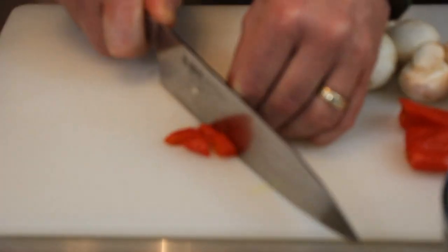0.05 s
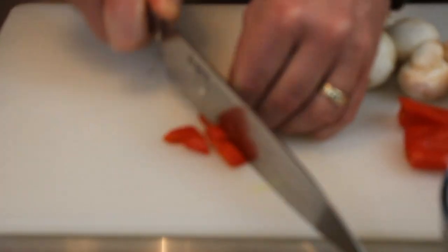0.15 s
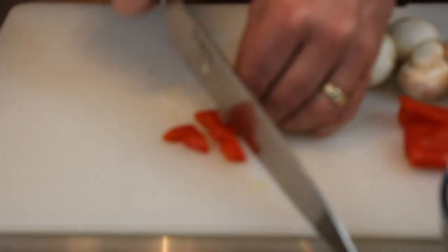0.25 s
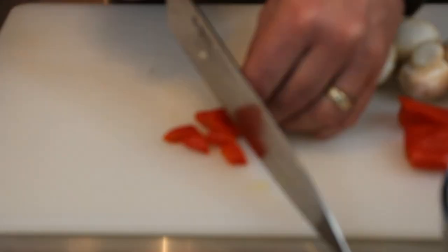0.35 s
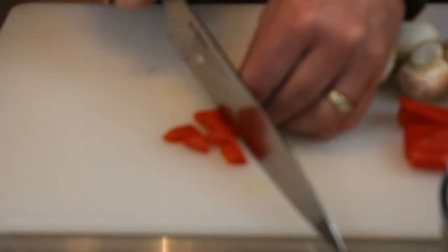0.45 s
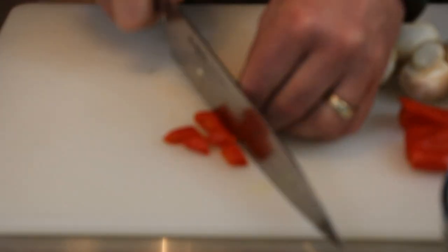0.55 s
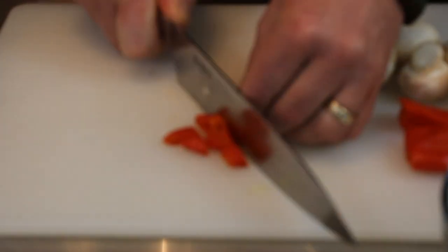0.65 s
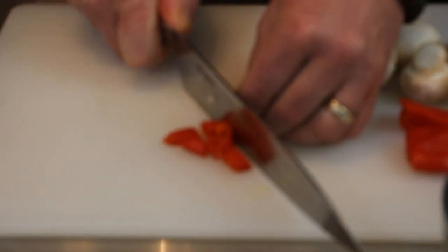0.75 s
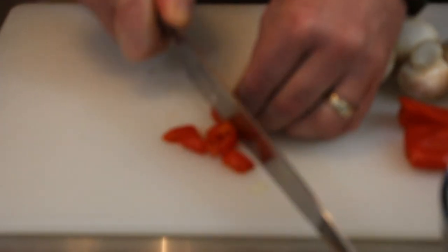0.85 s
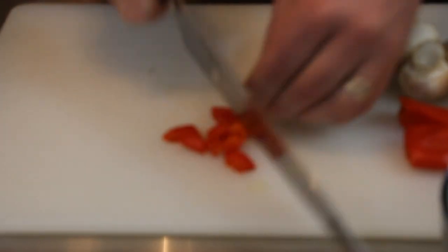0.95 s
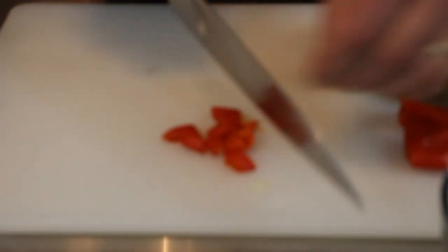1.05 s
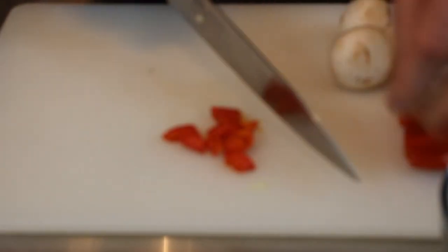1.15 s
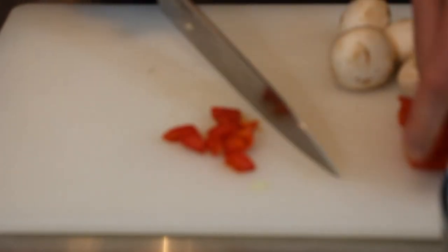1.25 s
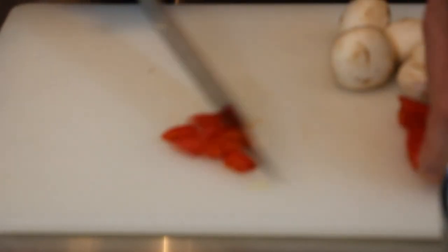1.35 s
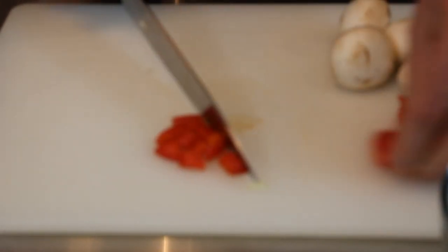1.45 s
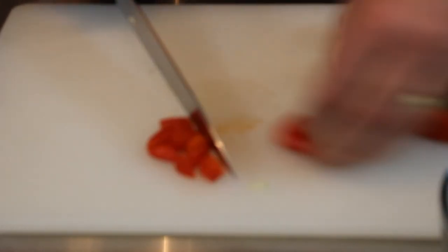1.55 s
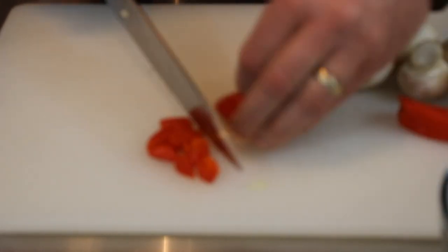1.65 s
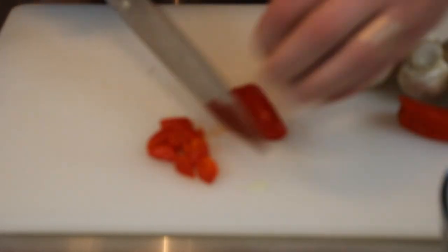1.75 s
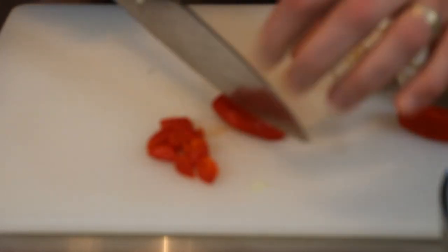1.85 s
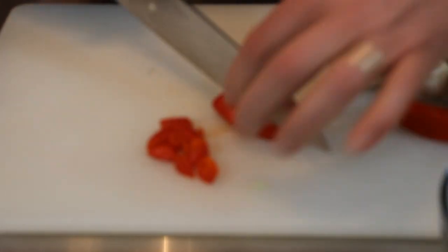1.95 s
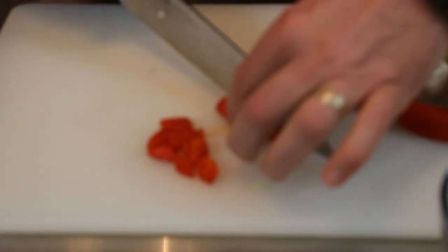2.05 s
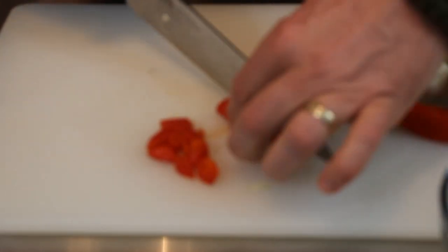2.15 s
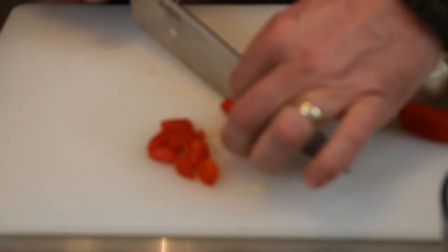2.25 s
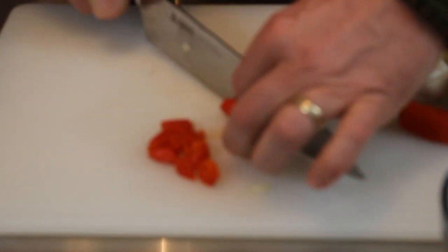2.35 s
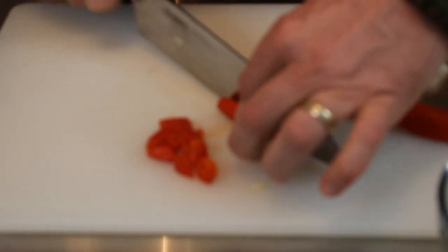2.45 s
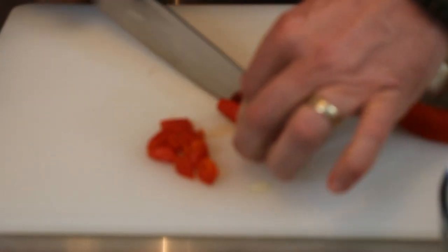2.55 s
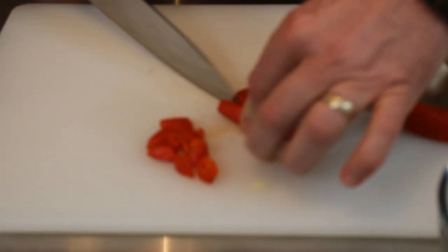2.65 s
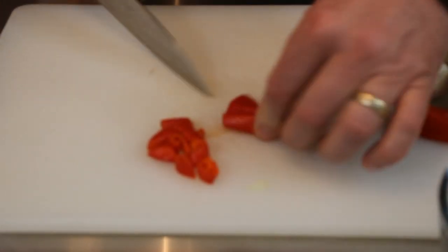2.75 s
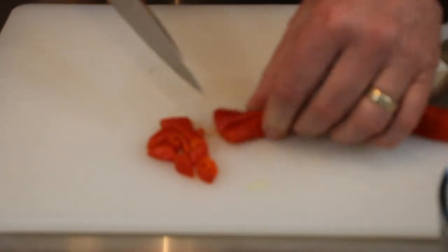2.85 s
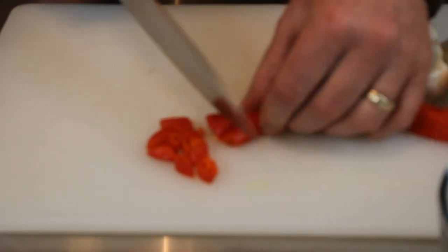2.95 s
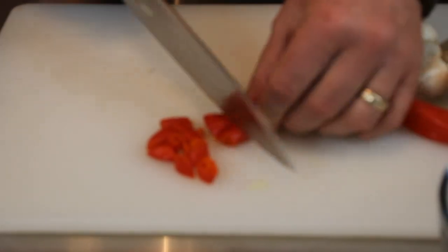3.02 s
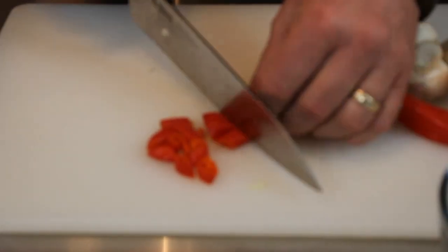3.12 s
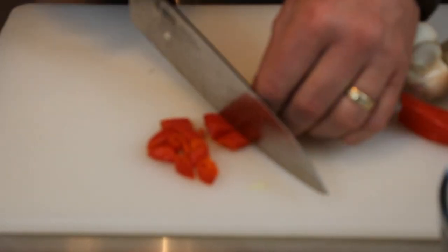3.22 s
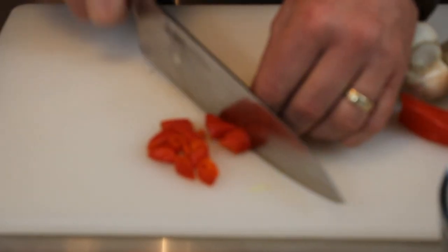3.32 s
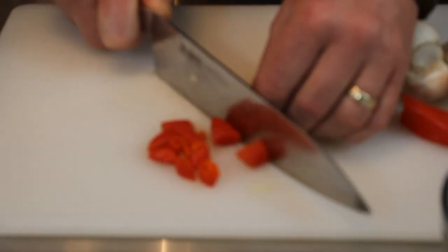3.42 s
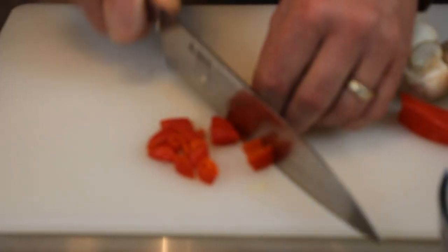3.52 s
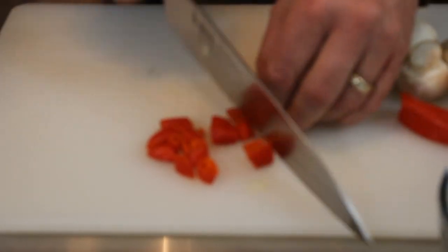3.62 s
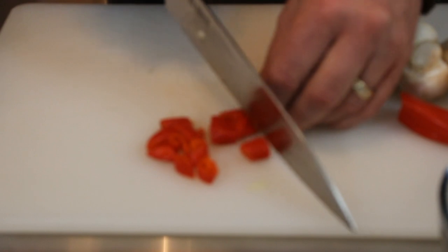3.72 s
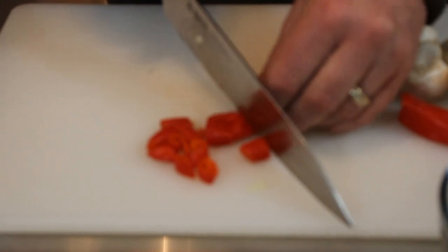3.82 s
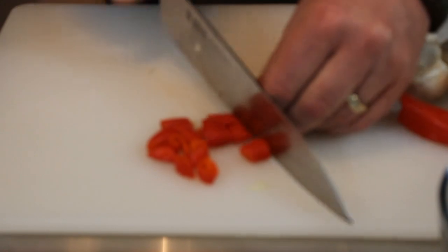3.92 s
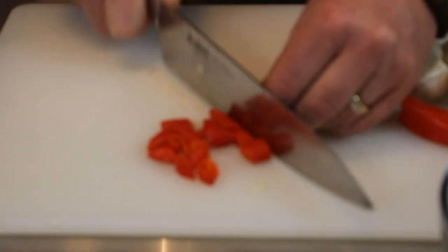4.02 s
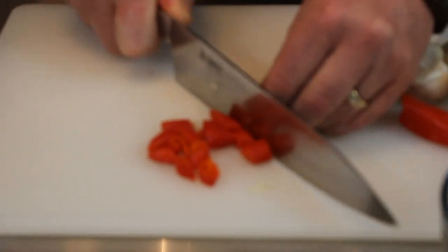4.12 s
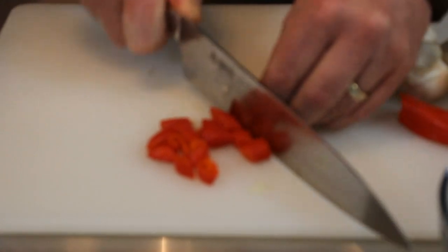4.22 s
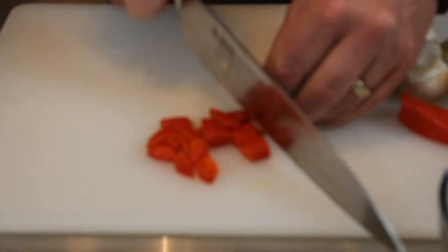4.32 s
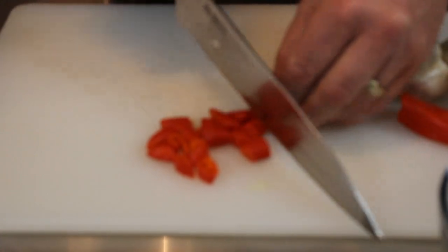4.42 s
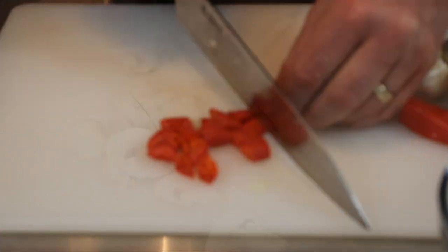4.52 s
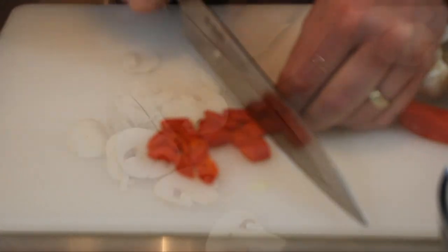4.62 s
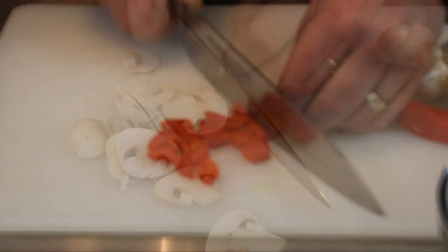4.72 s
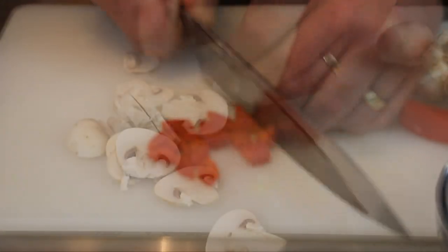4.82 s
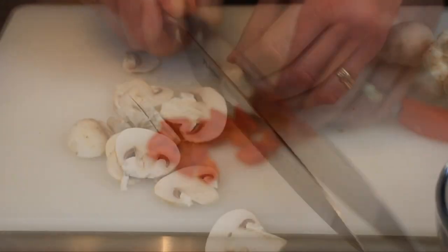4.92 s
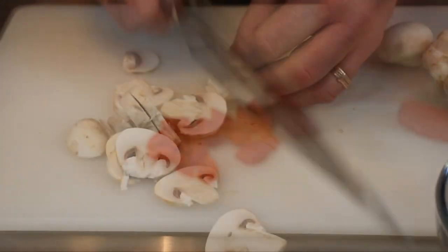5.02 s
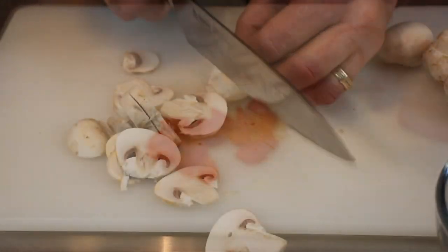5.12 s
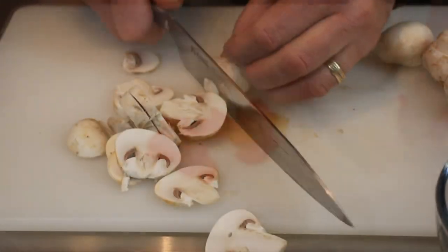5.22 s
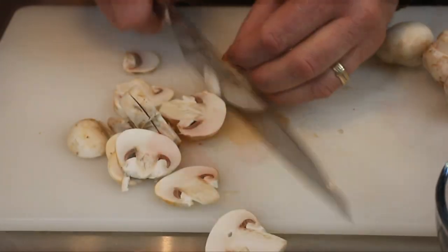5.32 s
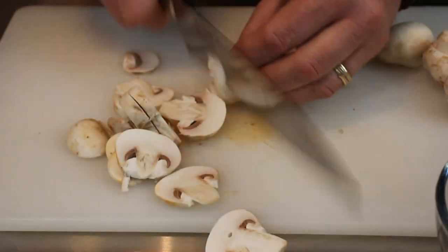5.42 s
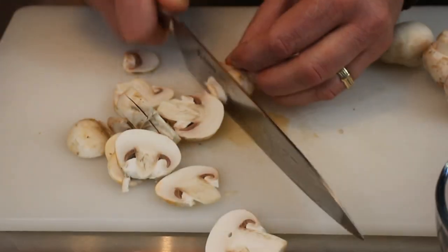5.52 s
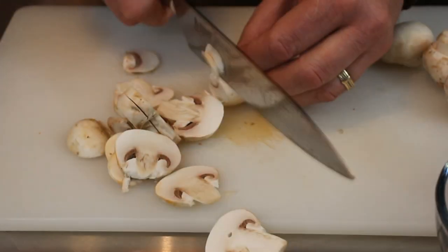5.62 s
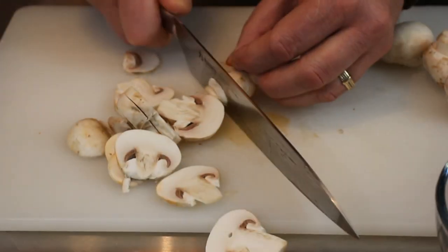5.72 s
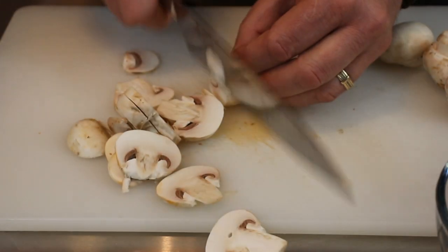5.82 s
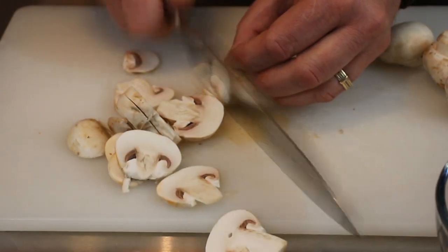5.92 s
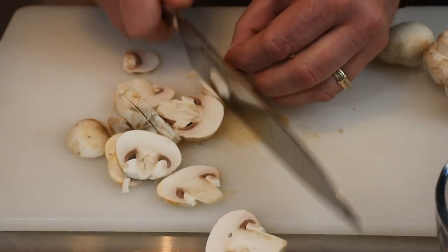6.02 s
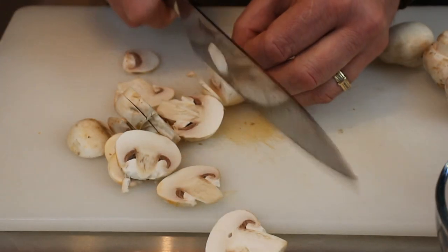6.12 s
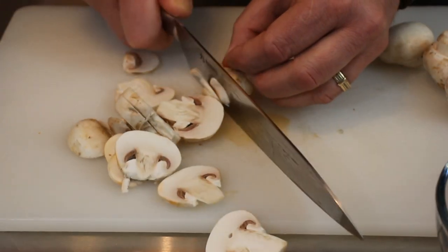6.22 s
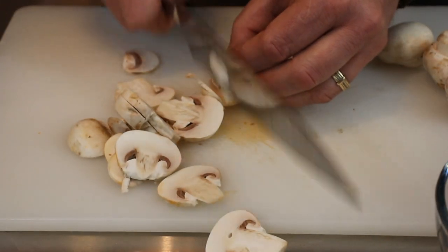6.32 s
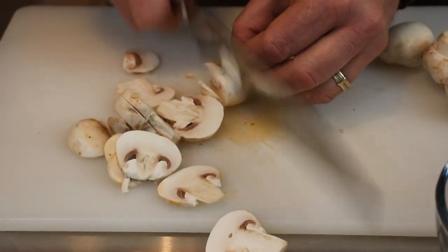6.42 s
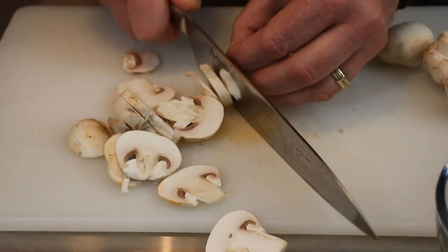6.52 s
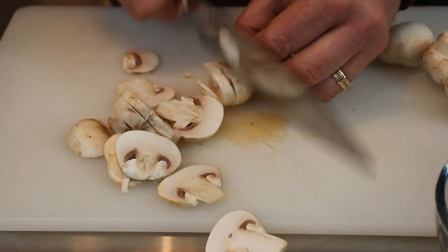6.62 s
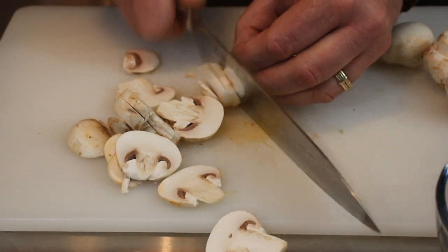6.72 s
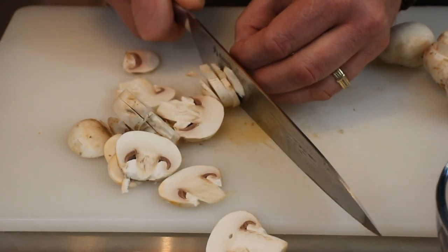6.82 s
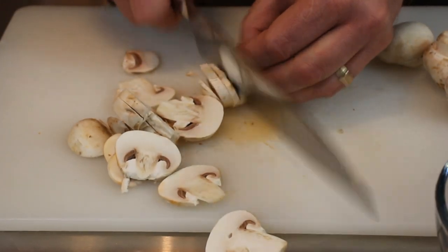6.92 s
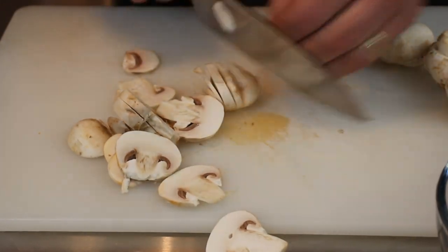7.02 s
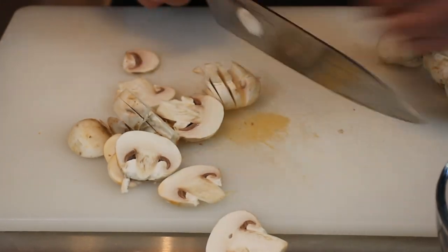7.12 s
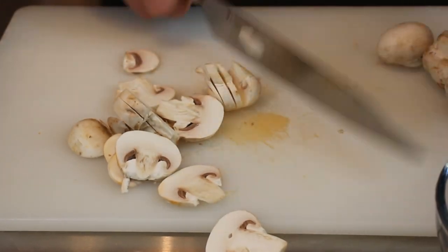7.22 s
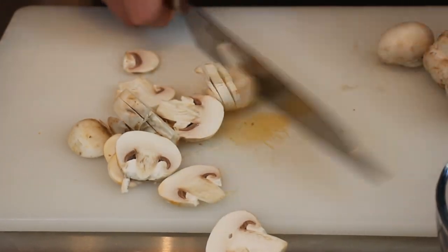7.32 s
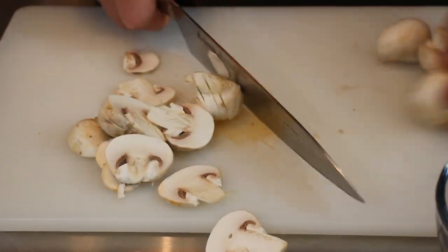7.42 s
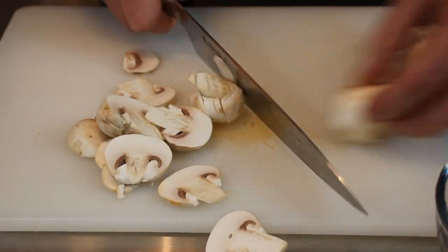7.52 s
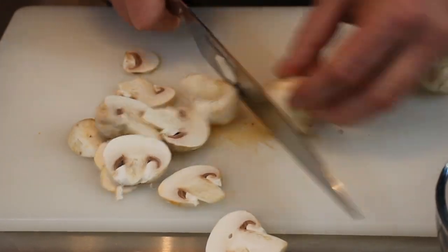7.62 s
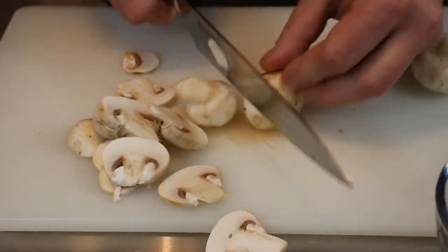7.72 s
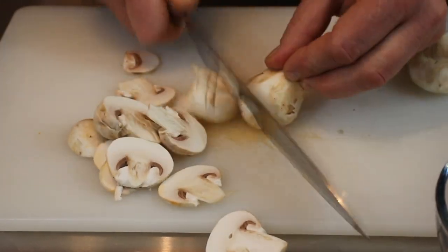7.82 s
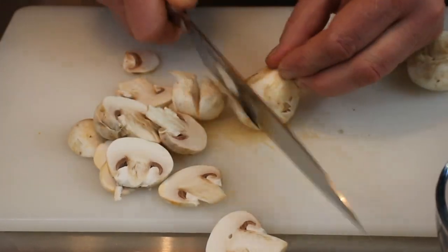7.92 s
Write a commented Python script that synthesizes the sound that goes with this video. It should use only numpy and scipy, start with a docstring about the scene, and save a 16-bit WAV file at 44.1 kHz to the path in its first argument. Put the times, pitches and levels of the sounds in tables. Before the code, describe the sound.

A chef's knife crunches through pepper, then mushrooms, knocking hard on a plastic board, first in scattered blows, then a brisk even run, in a live kitchen.

```python
"""A chef's knife close to the microphone cuts a pepper, then mushrooms, on a plastic board in a live kitchen.
Each blow rings damped modes of the board's face and body, with a click, a diffuse echo and standing waves.
Noisy grains make the crunch, two sideways scrapes of the edge, some soft slides and one short tick. Behind it
lie room air and an appliance's drone. A limiter ducks the loud knocks and recovers steadily."""
import sys
import numpy as np
from scipy import signal
from scipy.fft import rfft, irfft, next_fast_len
from scipy.io import wavfile
from scipy.ndimage import uniform_filter1d

SR = 44100
rng = np.random.default_rng(int(sys.argv[2]) if len(sys.argv) > 2 else 0)


def output_pcm(signal):
    """Save a mono or channel-first signal as 16-bit PCM at the path in sys.argv[1].

    Samples are clipped to [-1, 1] before scaling.
    """
    pcm = np.clip(np.atleast_2d(signal).T, -1, 1) * 32767
    wavfile.write(sys.argv[1], SR, np.round(pcm).astype(np.int16))


N = 351036
TIME = np.arange(N) / SR
SPLICE_S = 4.963  # the pepper scene ends and the mushroom scene begins


def amp(db):
    """Turn decibels into an amplitude factor."""
    return 10 ** (np.asarray(db) / 20)


def unit(x):
    """Scale a sound to rms 1."""
    return x / np.sqrt(np.mean(x ** 2) + 1e-20)


def along(points, hz):
    """Interpolate (Hz, value) points on a logarithmic frequency axis."""
    point_hz, value = np.transpose(points)
    return np.interp(np.log(hz + 1), np.log(point_hz), value)


def filtered(x, response):
    """Multiply the spectrum of x by a function of frequency, without phase shift."""
    size = x.shape[-1]
    padded = next_fast_len(size + 8192)
    hz = np.fft.rfftfreq(padded, 1 / SR)
    return irfft(rfft(x, padded) * response(hz), padded)[..., :size]


def coloured(x, points):
    """Shape x by a (Hz, dB) curve and bring it to rms 1."""
    return unit(filtered(x, lambda hz: amp(along(points, hz))))


def add(track, start_s, sound):
    """Mix a sound in at its start; what starts before the splice stops there."""
    start = round(start_s * SR)
    limit = round(SPLICE_S * SR) if start_s < SPLICE_S else N
    first = max(start, 0)
    stop = min(start + sound.shape[-1], limit)
    if stop > first:
        track[..., first:stop] += sound[..., first - start:stop - start]


def ring(modes, wander=0):
    """Sum damped sines over a second; each strike varies their strength and, by wander, their pitch."""
    hz, db, t60 = np.transpose(modes)[:, :, None]
    t = TIME[:min(SR, round(2 * t60.max() * SR))]
    hz = hz * (1 + wander * rng.uniform(-1.22, 1, hz.shape))
    level = amp(db + 1.6 * rng.standard_normal(db.shape))
    decay = np.exp(-np.log(1000) * t / t60)
    sound = np.sum(level * decay * np.sin(2 * np.pi * hz * t), axis=0)
    return np.pad(sound, (0, SR - len(t)))


def grains(rate):
    """Scatter tiny impulses of uneven size, on average rate a second."""
    return (rng.random(N) < rate / SR) * rng.laplace(size=N)


def strokes(rows):
    """Add a bell of loudness for each stroke (middle s, spread s, dB)."""
    total = np.zeros(N)
    for middle_s, spread_s, db in rows:
        total += amp(db) * np.exp(-((TIME - middle_s) / spread_s) ** 2 / 2)
    return total


# Stereo width of sound from all around the microphone. Each row: frequency in Hz, side over mid in dB.
STEREO_WIDTH = [(100, -17), (400, -15.5), (1200, -8), (3000, -4.5), (8000, -1)]


def diffuse(size):
    """Make stereo noise from all around: alike in the bass, nearly unrelated in the treble."""
    mid, side = rng.standard_normal((2, size))
    side = filtered(side, lambda hz: amp(along(STEREO_WIDTH, hz)))
    return np.array([mid + side, mid - side])


# How long the kitchen rings. Each row: frequency in Hz, time to fall by 60 dB in seconds.
KITCHEN_DECAY = [(100, 0.75), (250, 0.48), (1000, 0.5), (3000, 0.41), (8000, 0.39), (15000, 0.3)]


def echo(colour):
    """The kitchen's answer, of energy 1: it builds within milliseconds and its treble dies first."""
    hz, t, spectrum = signal.stft(coloured(diffuse(size=SR), colour), SR, nperseg=256)
    decay = np.exp(-np.log(1000) * t / along(KITCHEN_DECAY, hz)[:, None])
    tail = signal.istft(spectrum * decay, SR, nperseg=256)[1][:, :SR]
    tail = tail * (1 - np.exp(-(TIME[:SR] / .003) ** 2))
    return unit(tail) / np.sqrt(SR)


# Colour of the kitchen's air noise. Each row: frequency in Hz, relative level in dB per Hz.
AIR_COLOUR = [(25, -22), (45, -0.5), (65, 2.5), (85, -10.5), (125, -1.5), (170, -2), (250, -2.5), (310, -8),
              (380, -3.5), (550, -8.5), (1200, -13), (2200, -19.5), (6000, -27), (16000, -38)]
# Lines of an appliance's drone. Each row: frequency in Hz, level in dB.
APPLIANCE_LINES = [(166.9, -55), (242.2, -52.5), (360.7, -52), (597.5, -59.5), (839.8, -58.5), (1211, -63)]


def room_tone(air_db=-44, hum_db=0, waver_hz=7):
    """Steady air noise, and an appliance's drone whose lines are narrow bands of noise."""
    def lines(hz):
        return sum(amp(db) / (1 + ((hz - centre) / waver_hz) ** 2) for centre, db in APPLIANCE_LINES)

    drone = unit(filtered(rng.standard_normal(N), lines))
    drone = drone * np.linalg.norm([amp(db) for _, db in APPLIANCE_LINES])
    air = coloured(diffuse(size=N), AIR_COLOUR)
    return amp(air_db) * air + amp(hum_db) * drone


# The edge set down on the board, then scraped sideways. Each row: contact in seconds, force in dB,
# wait for the fastest moment in seconds, spread of the stroke in seconds, scrape level in dB.
SWEEPS = [(1.2645, 0, 0.12, 0.036, -29.5), (7.3058, 5, 0.079, 0.028, -29.5)]
# Colour of the edge on plastic. Each row: frequency in Hz, relative level in dB per Hz.
EDGE_COLOUR = [(100, -4.5), (250, 3.5), (600, 5.5), (1300, -3.5), (2500, -5.5), (4500, -11.5), (7000, -15),
               (11000, -22.5), (15500, -20)]
# Resonances of the blade. Each row: frequency in Hz, width in Hz, level of the added resonance in dB.
BLADE_MODES = [(1220, 62, 11), (1904, 100, 5.5), (5940, 97, 4.5), (6170, 84, -2), (7870, 120, 6),
               (8900, 120, 12), (10000, 220, 13.5), (11320, 140, 13), (11800, 150, 6)]
# Soft slides of the knife and of cut pieces over the board, and one short tick.
# Each row: middle in seconds, spread in seconds, level in dB.
SLIDES = [(1.6, .075, -49.5), (2.585, 0.033, -44), (2.70, 0.097, -48.5), (4.715, 0.0083, -46),
          (7.6, 0.024, -57)]
# Colour of the slides and the tick. Each row: frequency in Hz, relative level in dB.
SLIDE_COLOUR = [(60, -22), (200, 10), (600, 2.5), (1400, 0), (2500, 0), (3400, 0), (4600, -5.5),
                (7000, -11), (11500, -10), (16000, -25)]


def scraping():
    """The edge sticks and slips on the plastic and rings the blade; soft slides and a tick join it."""
    def steel(hz):
        return 1 + sum(amp(db) / (1 + (2 * (hz - centre) / width) ** 2)
                       for centre, width, db in BLADE_MODES)

    rasp = unit(filtered(coloured(grains(rate=12000), EDGE_COLOUR), steel))
    scrapes = [(s + wait_s, spread_s, db) for s, _, wait_s, spread_s, db in SWEEPS]
    sliding = coloured(grains(rate=14000), SLIDE_COLOUR)
    return strokes(scrapes) * rasp + strokes(SLIDES) * sliding


# The plastic board under the blade. Each row: frequency in Hz, level in dB, 60 dB decay in seconds.
BOARD_MODES = [(273, -15.5, .05), (690, -4.5, .034), (831, -20, .029), (984, -15, .044), (1342, -11, .016),
               (1520, -17, .03), (1950, -23, .03), (2719, -12.5, .022), (3050, -20, .02), (4850, -23, .014)]
# The board's body, thudding low. Each row: frequency in Hz, level in dB, 60 dB decay in seconds.
BODY_MODES = [(160, -30, 0.034), (231, -36.5, 0.099), (389, -26.5, 0.082), (548, -27.5, 0.11)]


def board_knock(flatness=0, wander=0, thud_db=13, bass_hz=170):
    """Board modes, plus the body's low thud from a flat landing; a small board pushes little air in the bass."""
    knock = ring(BOARD_MODES, wander)
    knock = knock + flatness * amp(thud_db) * ring(BODY_MODES, wander)
    return signal.lfilter(*signal.butter(2, bass_hz, "high", fs=SR), knock)


# The knife cuts through and meets the board. Each row: contact in seconds, force in dB,
# flatness of the landing from 0 to 1, time in the flesh in seconds, crunch level at the board in dB.
CHOPS = [(.008, -8, 0.4, 0.026, -35), (0.6896, 10.5, 0.6, 0.1, -38), (2.3089, -6.5, .3, 0.063, -36),
         (3.342, 2, 1, 0.043, -40.5), (4.0944, 11.5, 0.16, 0.022, -34.5), (4.801, 10.5, 0.7, .097, -42.5),
         (5.2518, 10, 0.33, 0.037, -49), (5.5157, 13, 0, 0.048, -47.5), (5.7532, 12.5, 0.1, .02, -58),
         (5.9925, 12, 0.23, .035, -42.5), (6.2362, 13.5, 0.2, .02, -62), (6.5110, 10, 0.32, 0.029, -37),
         (6.785, 12.5, 0.16, 0.036, -37.5), (7.8893, 9, 0.2, 0.025, -42.5)]
# Crisp bits of skin or stem giving way. Each row: start in seconds, level in dB.
SNAPS = [(.5995, -24.5), (.6580, -14), (.6747, -12.5), (.6868, -10), (2.2996, -13.5), (3.3105, -26),
         (3.3358, -15), (4.797, -9.5), (6.491, -20)]
# Colour of bursting cells. Each row: frequency in Hz, relative level in dB per Hz.
FLESH_COLOUR = [(40, -28), (90, -15), (200, 13), (600, 8), (1500, 0), (3000, 2), (5000, -5), (8000, -8.5),
                (12000, -16), (16000, -20)]


def crunch(snap_db=-5, knock_db=-3, sink_db=3, skin_db=-21, skin_s=0.008):
    """Bursting cells grow louder as the blade sinks to the board; snaps also jolt the board."""
    pressure, snaps = np.zeros(N), np.zeros(N)
    for s, _, _, cut_s, db in CHOPS:
        to_go = TIME[:max(round(cut_s * SR), 2)][::-1]
        flesh = amp(db - sink_db * to_go / cut_s)
        # tough pepper skin tears last, just above the board; mushrooms have none
        skin = amp(skin_db) * (to_go < skin_s) if s < SPLICE_S else 0
        add(pressure, s - cut_s, flesh + skin)
    for s, db in SNAPS:
        tear = coloured(rng.standard_normal(SR), FLESH_COLOUR) * np.exp(-TIME[:SR] / 0.0011)
        add(snaps, s, amp(db) * (amp(snap_db) * tear - amp(knock_db) * board_knock()))
    pressure = uniform_filter1d(pressure, size=64)  # the flesh gives way over a millisecond or two
    return snaps + pressure * coloured(grains(rate=9000), FLESH_COLOUR)


# Standing waves of the kitchen. Each row: frequency in Hz, level in dB, 60 dB decay in seconds.
STANDING_MODES = [(212.2, -21.5, 0.63), (243.8, -34.5, 0.86), (260, -28.5, 0.64), (360.4, -23, 0.28),
                  (419, -27.5, 0.58), (688, -35.5, 0.7), (856, -25.5, 0.21), (970, -35, 0.58),
                  (1372, -33.5, 0.51), (1820, -38, 0.53), (2000, -30.5, 0.36)]
# Their change at the microphone's other place for the mushrooms. Each row: frequency in Hz, change in dB.
MOVED_MICROPHONE = [(212, -3.5), (250, 5.5), (355, -1)]


def standing_waves(s):
    """Ring the kitchen's modes as strongly as they reach the microphone's place at time s."""
    modes = [(hz, db + (s > SPLICE_S) * along(MOVED_MICROPHONE, hz), t60)
             for hz, db, t60 in STANDING_MODES]
    return ring(modes)


def blows(contact_hz=2280, set_down_hz=860, set_down_flatness=0.14, hardening=0.32, dulling_db=-4):
    """List contacts as (s, force dB, flatness, corner Hz): harder is brighter, flatter is duller."""
    # the corners are those of a 0 dB edge-on blow; setting down is the duller contact
    contacts = [(s, db, flatness, contact_hz) for s, db, flatness, *_ in CHOPS]
    contacts += [(s, db, set_down_flatness, set_down_hz) for s, db, *_ in SWEEPS]
    return [(s, db, flatness, hz * amp(hardening * db + dulling_db * flatness))
            for s, db, flatness, hz in contacts]


# What the board throws into the room. Each row: frequency in Hz, relative level in dB per Hz.
ROOM_COLOUR = [(30, -10.5), (90, -12.5), (160, -11.5), (250, -1), (450, 1), (700, 1), (1100, -4),
               (1600, -4.5), (2600, -9.5), (4000, -15), (7000, -15), (11000, -9.5), (16000, -10)]


def chops(room_db=14.0, standing_db=-2, change=0.69, click_db=-22, near_walls=1.0, near_s=0.012):
    """The edge strikes the board through a lowpass contact; the echo shifts as the knife moves."""
    out, usual, t = np.zeros((2, N)), echo(ROOM_COLOUR), TIME[:SR]
    for s, db, flatness, corner_hz in blows():
        click = amp(click_db) * np.exp(-t / 0.00097) * diffuse(size=SR)
        direct = board_knock(flatness, wander=.05) + click
        room = amp(room_db) * (usual + change * echo(ROOM_COLOUR)) / np.hypot(1, change)
        room = room * (1 + near_walls * np.exp(-t / near_s))  # worktop and cupboards answer first
        standing = amp(standing_db) * standing_waves(s) * (1 - np.exp(-t / 0.02))
        contact = signal.butter(2, min(corner_hz, SR / 3), fs=SR)
        add(out, s, amp(db) * signal.lfilter(*contact, direct + room + standing))
    return out


def scene(wet_db=-1):
    """The board lies a little to the right; crunch and scraping share one echo of the kitchen."""
    small = crunch() + scraping()
    small_echo = echo([(100, 6.5), (1000, -1.0), (4000, 2.5), (14000, -4)])  # (Hz, dB)
    walls = signal.fftconvolve(small[None], small_echo, axes=1)[:, :N]
    pan = amp([[-.7], [.7]])  # left and right in dB
    return (chops() + small + amp(wet_db) * walls + room_tone()) * pan


# Gentle bass cut after the limiter and clipping. Each row: frequency in Hz, gain in dB.
BASS_CUT = [(75, -8), (130, 0)]


def record(dry, release_db_per_s=105, threshold_db=.3, attack_s=.00095, top_hz=15900):
    """The limiter grabs too late for a loud knock's first swing, which clips, then lets go steadily."""
    level_db = 20 * np.log10(np.abs(dry).max(axis=0) + 1e-9)
    over_db = np.maximum(level_db - threshold_db, 0)
    recovery_db = release_db_per_s * TIME
    held_db = np.maximum.accumulate(over_db + recovery_db) - recovery_db
    lag = np.exp(-1 / (attack_s * SR))
    cut_db = signal.lfilter([1 - lag], [1, -lag], held_db)
    clipped = np.clip(dry * amp(-cut_db), -1, 1)
    rounded = uniform_filter1d(clipped, size=2, axis=1)  # the input stage rounds the corners
    return filtered(rounded, lambda hz: amp(along(BASS_CUT, hz)) * (hz < top_hz))


dry = scene()
out = record(dry)
output_pcm(out)
```